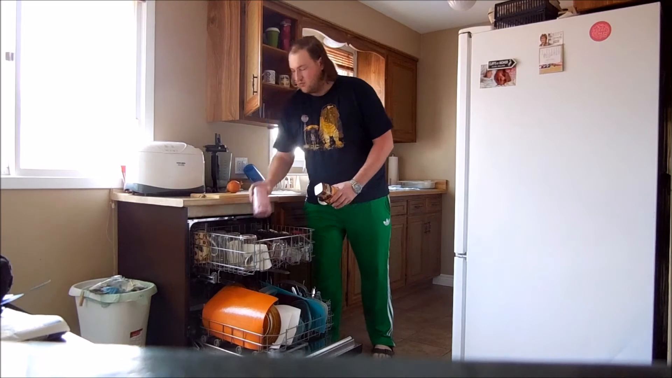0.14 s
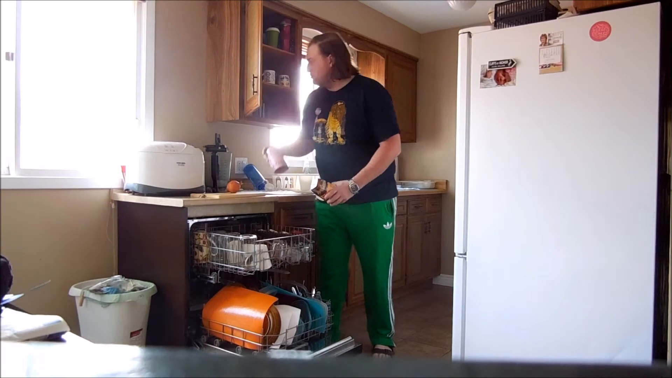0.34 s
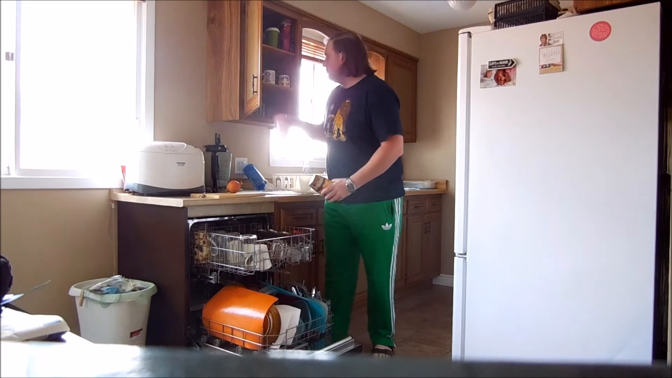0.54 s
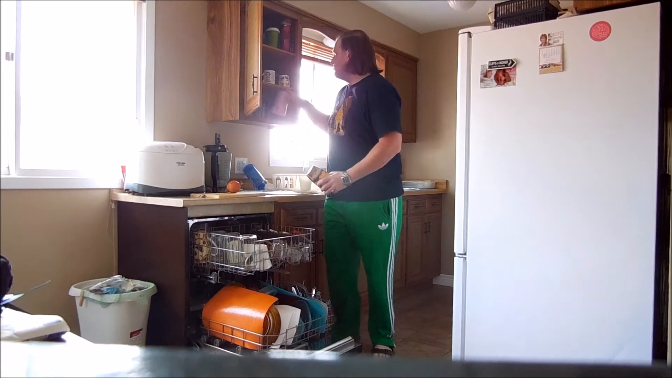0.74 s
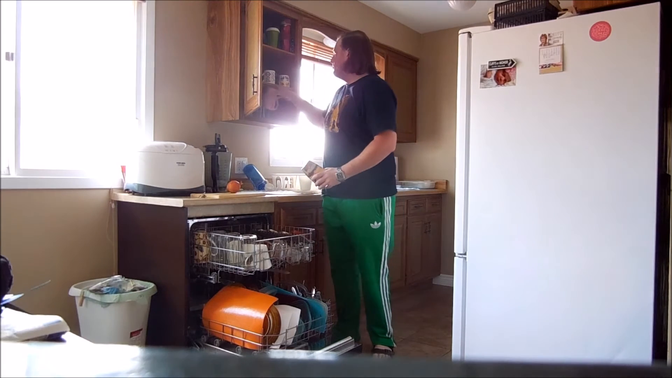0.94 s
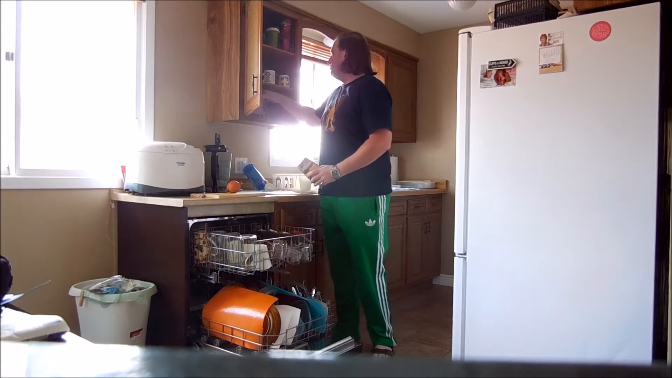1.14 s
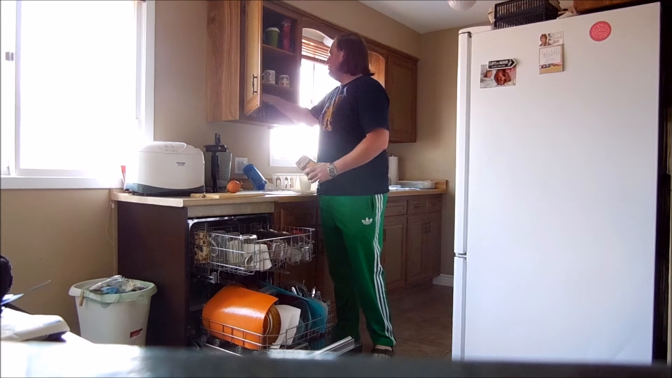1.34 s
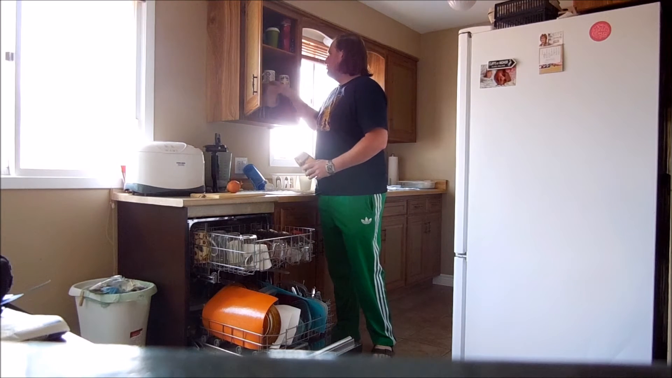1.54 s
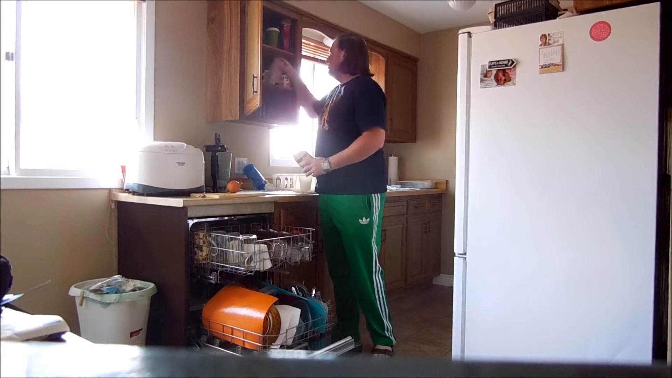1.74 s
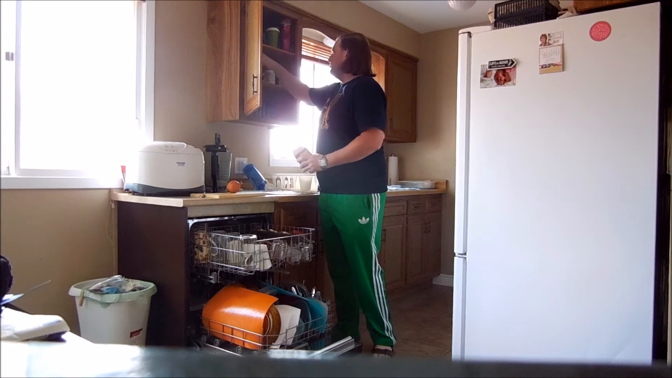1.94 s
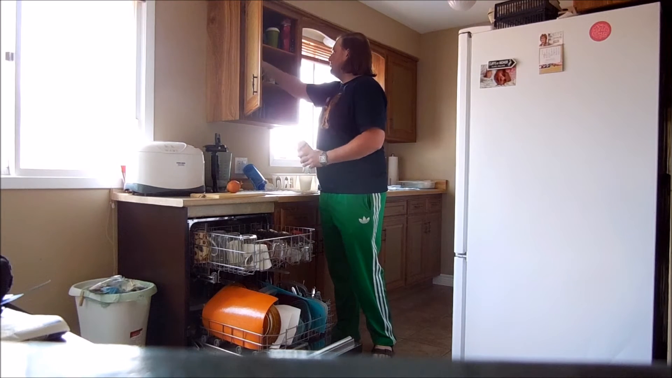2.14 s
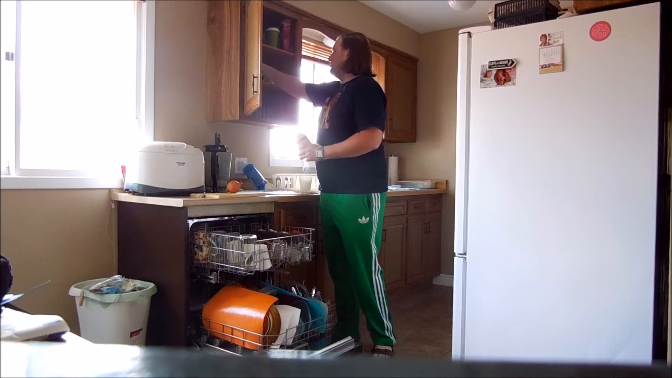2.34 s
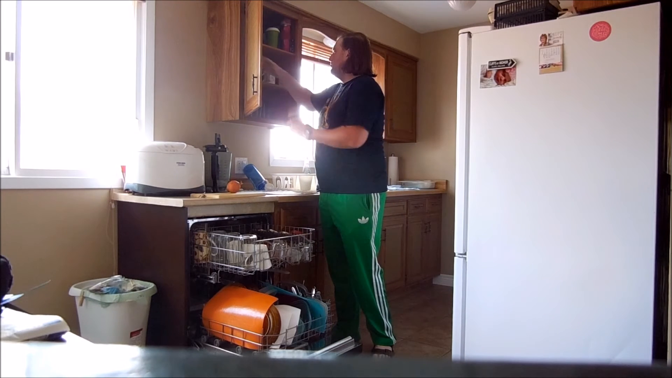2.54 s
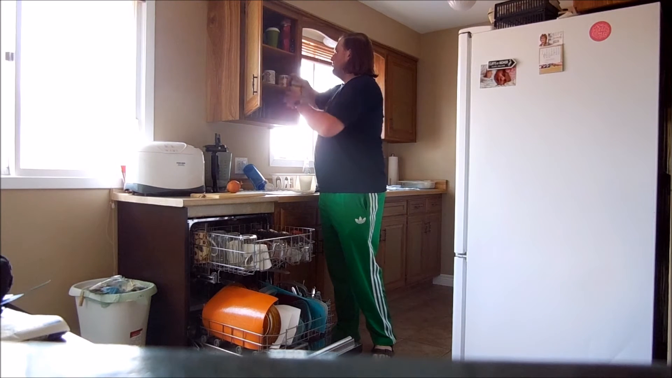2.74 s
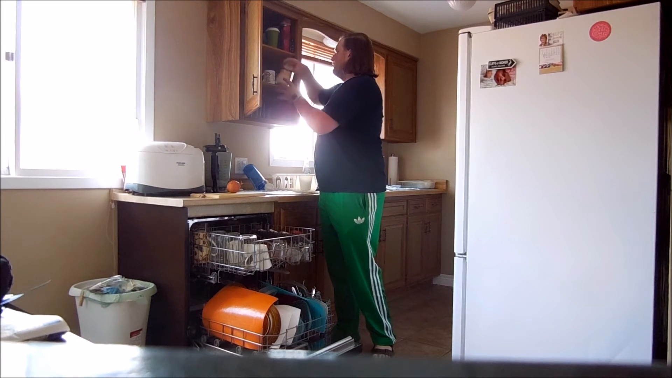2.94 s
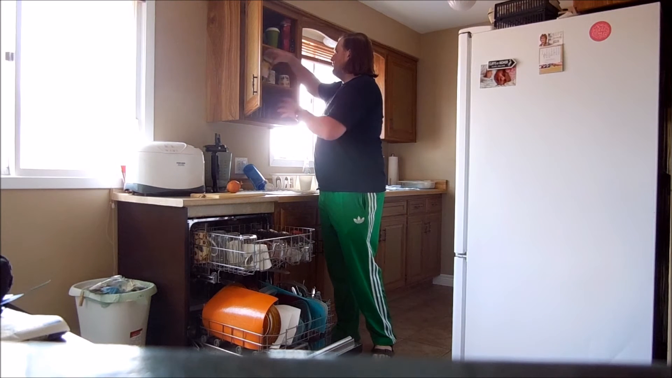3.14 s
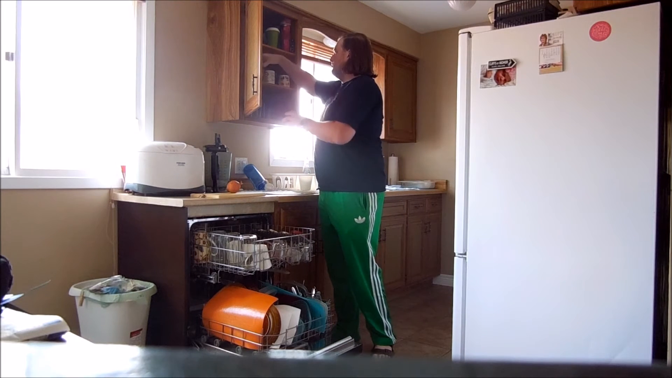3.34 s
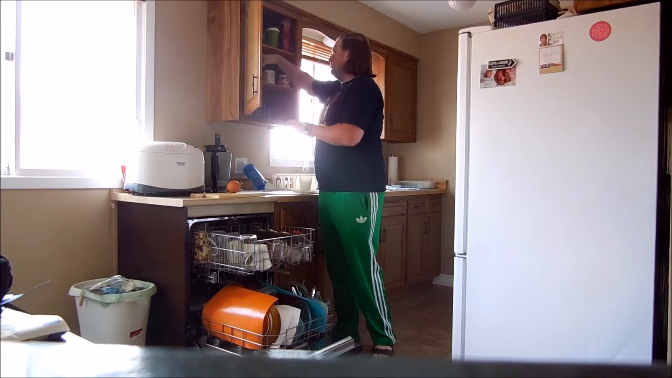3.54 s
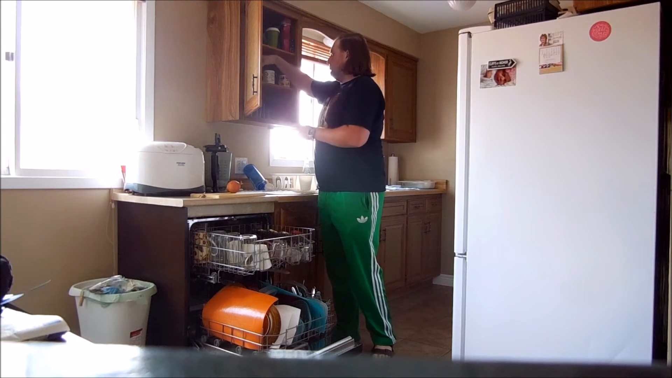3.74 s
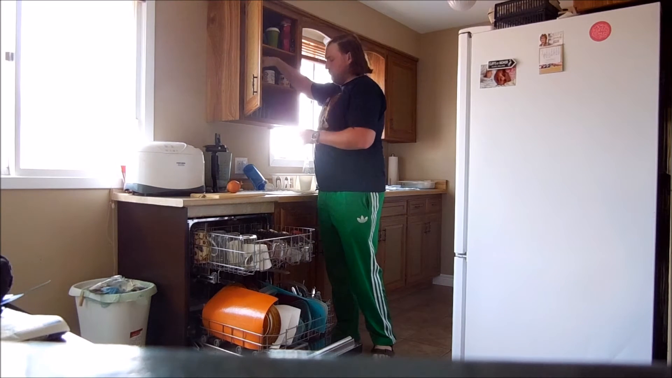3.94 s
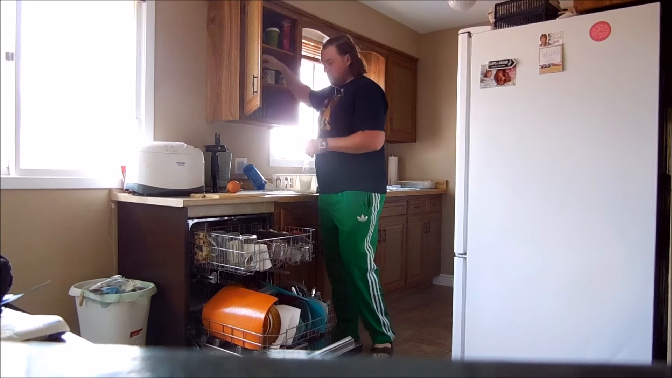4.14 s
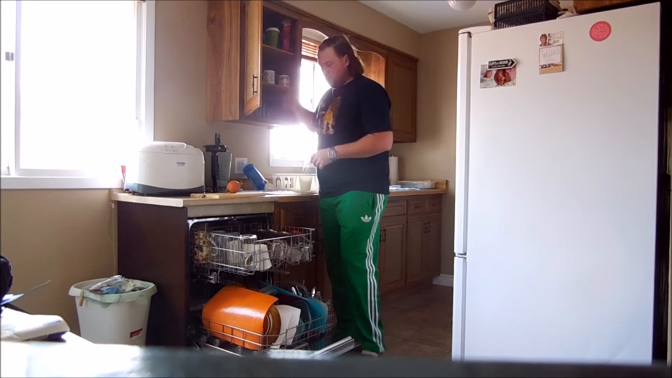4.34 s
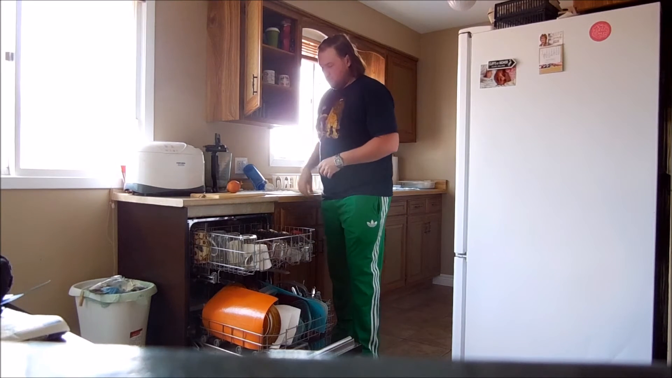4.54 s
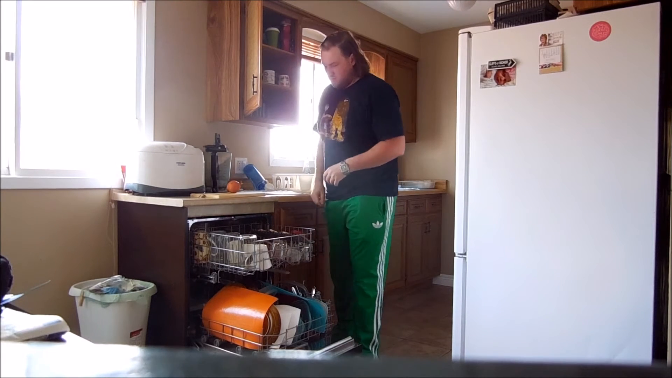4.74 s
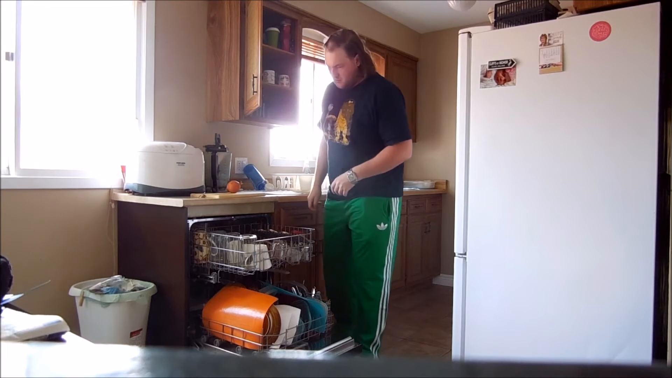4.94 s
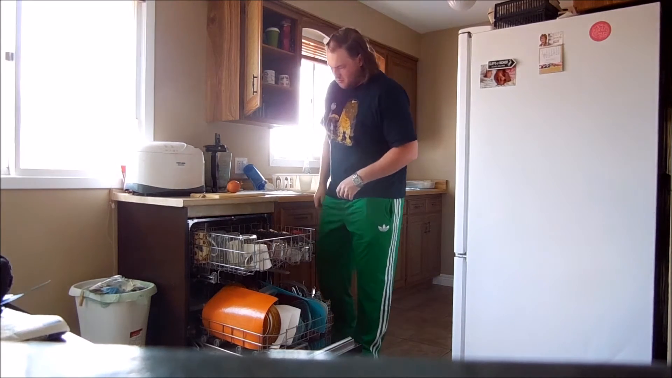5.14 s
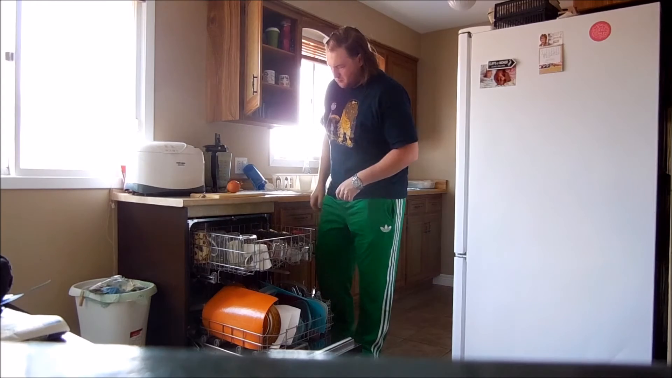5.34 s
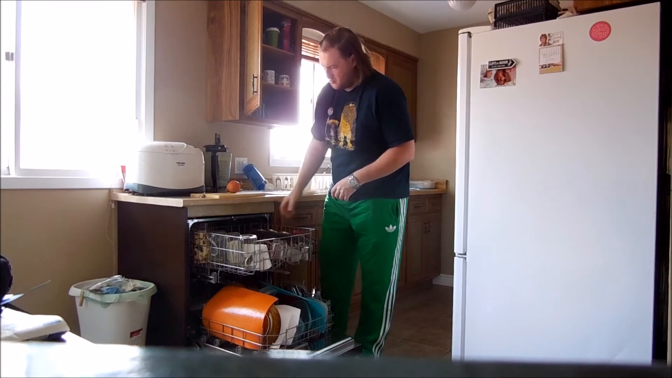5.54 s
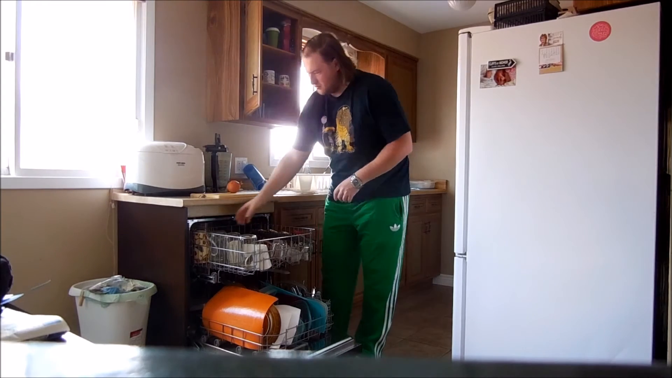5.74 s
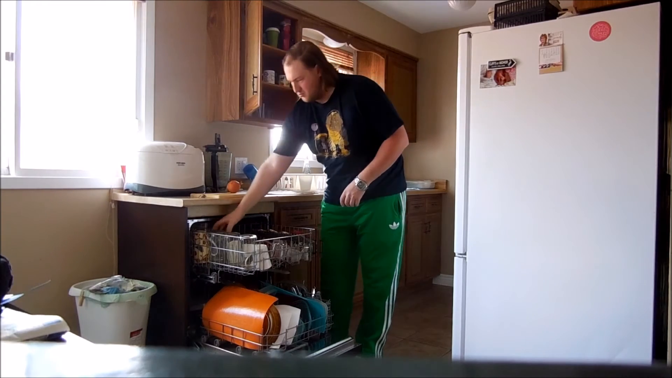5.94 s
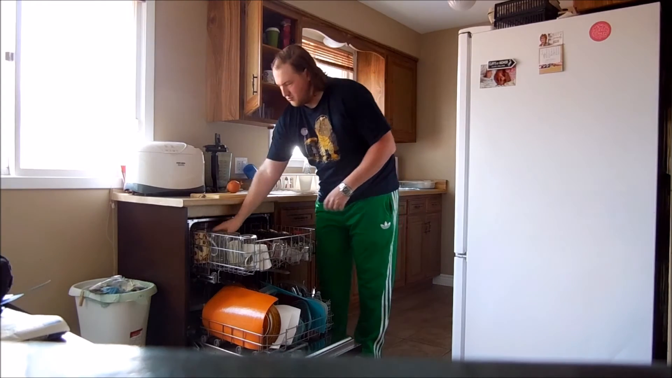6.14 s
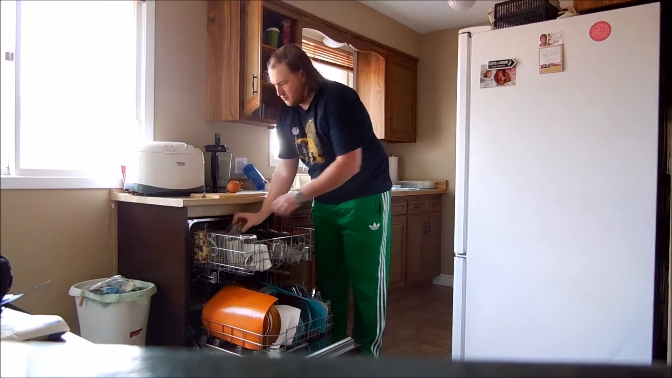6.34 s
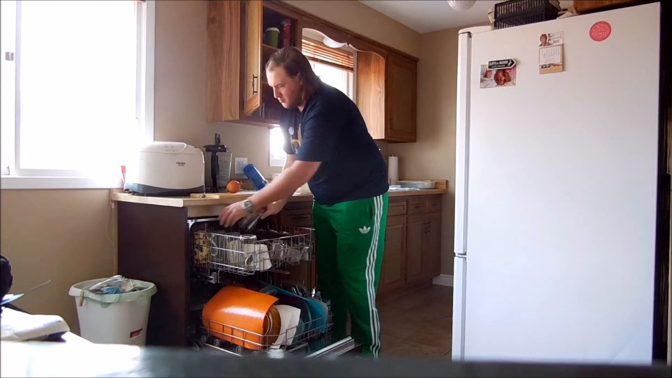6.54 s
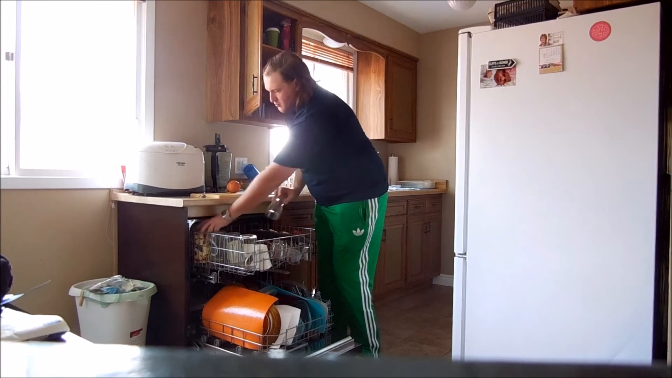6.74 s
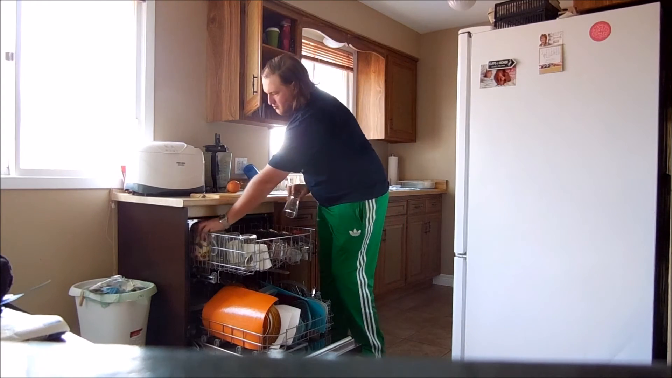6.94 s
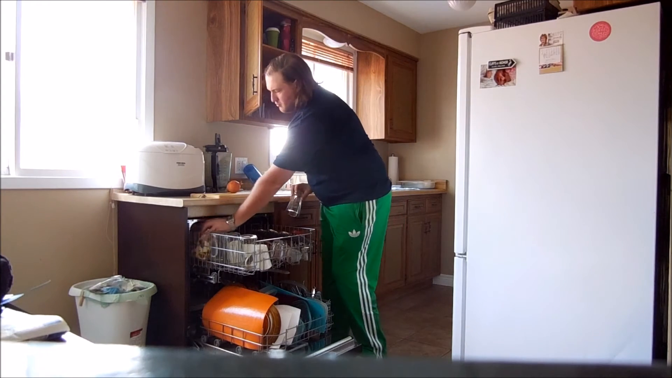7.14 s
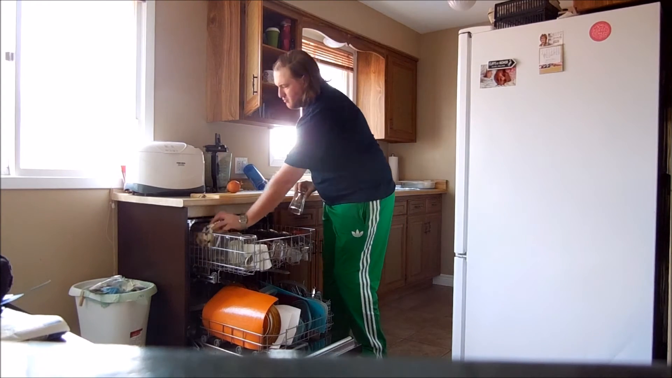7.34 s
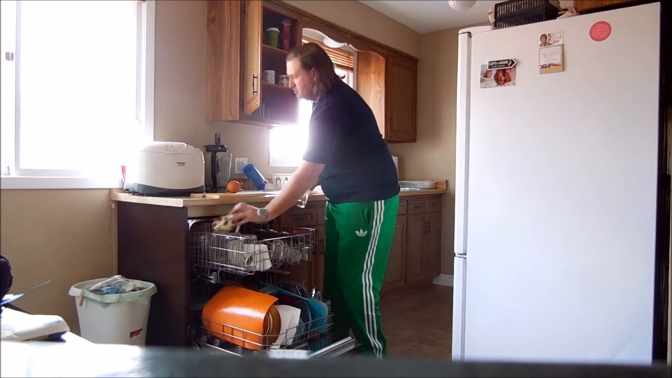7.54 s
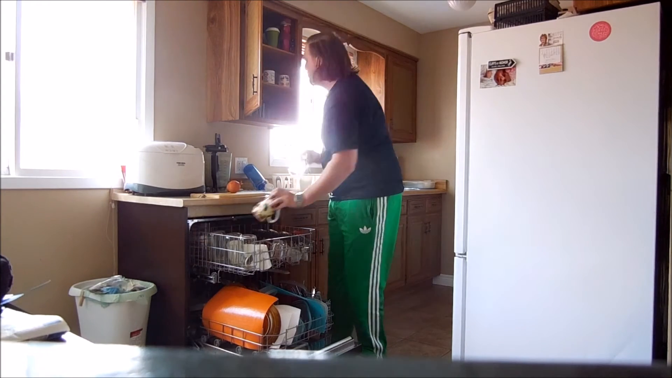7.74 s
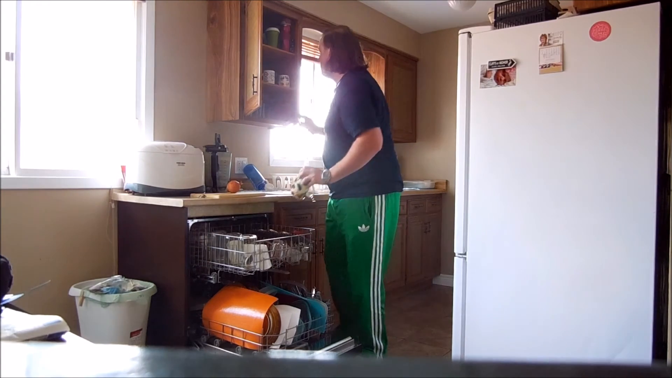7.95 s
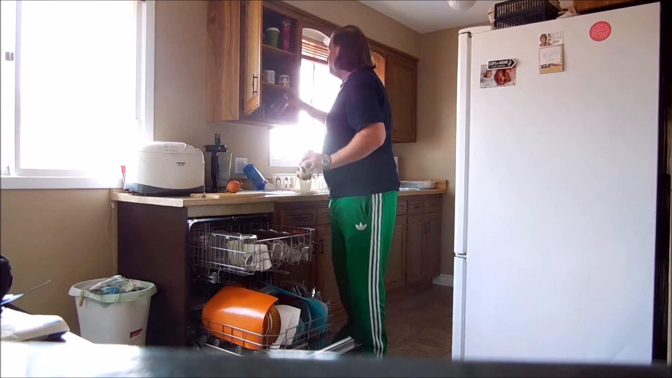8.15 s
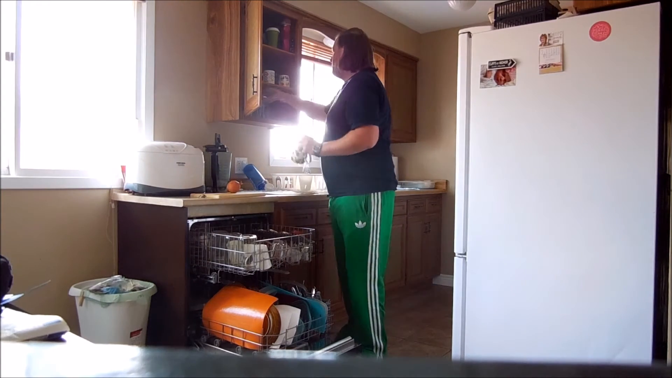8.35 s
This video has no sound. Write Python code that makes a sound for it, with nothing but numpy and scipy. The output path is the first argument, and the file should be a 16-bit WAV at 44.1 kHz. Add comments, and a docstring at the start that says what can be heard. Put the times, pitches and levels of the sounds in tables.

```python
"""A dishwasher is unloaded in a hard-walled kitchen, heard from across the room over a low hum and hiss.
First a tumbler clinks as the wire rack is jolted, then clothes swish and a base knocks on a wooden shelf.
Fingers tap a glass and a hand bumps the cupboard; then glasses and mugs clink and knock there.
Later more glasses clink, the rack is jolted and its wires rattle, and clothes swish again.
Glasses and mugs ring as sums of fading modes; knocks, cloth and room are shaped by coloured spectra."""
import sys
import numpy as np
from scipy import signal
from scipy.fft import rfft, irfft, next_fast_len
from scipy.io import wavfile
from scipy.ndimage import uniform_filter1d

SR = 44100
rng = np.random.default_rng(int(sys.argv[2]) if len(sys.argv) > 2 else 0)


def transcribe(u):
    """Save the signal u as a 16-bit wav file named by the first command-line argument.

    u: samples, shape (n,) or (channels, n), limited to [-1, 1]; the rate is SR.
    q: integer samples, one column per channel.
    """
    v = np.clip(np.atleast_2d(u).T, -1, 1)
    q = np.round(v * 32767).astype(np.int16)
    wavfile.write(sys.argv[1], SR, q)


N = 370881
HZ = np.maximum(np.fft.rfftfreq(SR, 1 / SR), 1)   # each blow is computed as one second of sound
AGE = np.arange(SR) / SR   # seconds since the blow
ONE_SAMPLE = np.exp(-2j * np.pi * HZ / SR)   # spectrum of a one-sample delay


def from_db(db):
    """Turn decibels into a gain."""
    return 10 ** (np.asarray(db) / 20)


def at_hz(points, hz):
    """Read a table between its points, on a log-frequency axis."""
    knots, values = np.transpose(points)
    return np.interp(np.log(hz), np.log(knots), values)


# How much the two channels differ: they sit a hand's width apart and hear the bass alike.
# Each row: frequency in Hz, side-to-mid level in dB.
SIDE_DB = [(40, -11), (85, -10), (180, -15), (350, -13.5), (750, -11.5), (1400, -5.5), (2800, -1),
           (5600, 0), (10000, -1.5), (14000, -.5)]


def diffuse(hz):
    """Spectrum of noise arriving from all sides at two close listening points."""
    apart = from_db(at_hz(SIDE_DB, hz))
    mid, side = rng.standard_normal((2, len(hz))) + 1j * rng.standard_normal((2, len(hz)))
    return np.array([mid + apart * side, mid - apart * side]) / np.sqrt(1 + apart ** 2)


# The quiet of the room, a low hum and hiss.
# Each row: frequency in Hz, relative level in dB per Hz.
HUSH_COLOUR = [(12, -33.5), (20, -5.5), (60, -2), (81, -14.5), (104, -12.5), (193, -17), (248, -14),
               (310, -18), (558, -21.5), (678, -22.5), (849, -23), (949, -23.5), (2750, -23),
               (14700, -23.5), (16000, -26)]


def room_noise(colour):
    """Noise from all sides with a given colour, scaled to an rms of 1."""
    size = next_fast_len(N, real=True)
    hz = np.maximum(np.fft.rfftfreq(size, 1 / SR), 1)
    noise = irfft(diffuse(hz) * from_db(at_hz(colour, hz)), size)[:, :N]
    return noise / noise.std()


def hush(level_db=-53):
    """Steady coloured noise gives the hum and hiss under everything."""
    return from_db(level_db) * room_noise(HUSH_COLOUR)


def causal(db):
    """The minimum-phase response with these levels: nothing sounds before the blow."""
    cepstrum = irfft(np.log(from_db(db)), SR)
    cepstrum[1:SR // 2] *= 2
    cepstrum[SR // 2 + 1:] = 0
    return np.exp(rfft(cepstrum))


# How long the kitchen echoes.
# Each row: frequency in Hz, time to fade by 60 dB in seconds.
KITCHEN = [(150, 0.68), (900, 0.65), (4000, 0.66), (13000, 0.38)]


def kitchen(direct_db=-16.0, early_db=2.5, early_s=0.086, build_s=0.00056):
    """Response from one spot: a weak direct path, reflections that build up, a tail that dies by band."""
    field, knots = diffuse(HZ), np.log([hz for hz, t60 in KITCHEN])
    echoes = 0
    for share, (hz, t60) in zip(np.eye(len(knots)), KITCHEN):
        band = field * np.interp(np.log(HZ), knots, share)
        echoes = echoes + irfft(band, SR) * from_db(-60 * AGE / t60)
    early_lift = from_db(early_db / (1 + (AGE / early_s) ** 4))
    echoes = echoes * early_lift * (1 - np.exp(-AGE / build_s))
    echoes /= np.sqrt(np.sum(echoes ** 2) / 2)
    echoes[:, 0] += from_db(direct_db)
    return rfft(echoes)


def at_level(response, db):
    """Scale a blow to the energy of 50 ms of sound at this level."""
    energy = np.vdot(response, response).real / SR
    return response * (from_db(db) * np.sqrt(SR / 20 / energy))


def add(out, s, response):
    """Mix one blow in at its moment."""
    start = round(s * SR)
    out[:, start:start + SR] += irfft(response, SR)[:, :N - start]


BOUNCE_GAP_RATIO = 0.72   # the second gap between touches is this share of the first
SETTLE_DB = 10.5   # lost on the last touch, as the object comes to rest


def touches(s, gap_s, rebound_db):
    """An object lands, rebounds and touches once more, sooner: (s, dB against the first touch)."""
    last_s = s + gap_s * (1 + BOUNCE_GAP_RATIO)
    return [(s, 0), (s + gap_s, rebound_db), (last_s, rebound_db - SETTLE_DB)]


def resonance(hz, t60):
    """Spectrum of one mode: a pitch that fades by 60 dB in t60 seconds."""
    r = from_db(-60 / (t60 * SR))
    feedback = r * r * ONE_SAMPLE - 2 * r * np.cos(2 * np.pi * hz / SR)
    return (1 - ONE_SAMPLE * ONE_SAMPLE) / (1 + ONE_SAMPLE * feedback)


REFERENCE_HZ = 3000   # ring times and brightness are given around this pitch
# The bare crack of a hard contact, also used for finger taps.
# Each row: frequency in Hz, relative level in dB per Hz.
CRACK = [(100, -32.5), (500, -2), (1500, -8.5), (3000, 0.5), (5000, -1), (8500, 3), (13000, 2.5),
         (14500, -33), (16000, -20)]
# The pitches each vessel rings with; the air in the gripped glass hoots near 450 Hz.
# Each row under a vessel's name: frequency in Hz, relative level in dB.
MODES_OF = { "tumbler": [(2110, 2), (2175, -3), (2686, 2.5), (2998, -6.5), (3198, -9), (3386, -8),
            (4156, -13), (5399, -8.5), (5674, -14), (5782, -6), (6180, -25), (6406, -20), (6648, -3.5),
            (7117, -2.5), (7510, -30), (8150, -18), (8640, -11), (9039, -12), (9706, -29), (10078, -24),
            (11030, -7), (11165, -3), (12462, -24), (12925, -9), (13168, -21), (13442, -13)],
            "shelf glass": [(2105, -11.5), (2191, -11), (2756, -17.5), (2902, -12), (3052, -15),
            (3402, -14), (3569, -3), (4156, -7), (4980, -11), (5416, -6), (5690, -3), (6218, -20),
            (6347, -9), (7499, 1.5), (7634, -13), (8985, 0), (9103, -18.5), (9512, -0.5), (9889, -27),
            (10697, -21), (11047, -39), (11160, -23), (12328, -11), (12737, -19), (13205, -5),
            (13426, -26)], "mug": [(1141, 0.5), (1583, -18), (2191, -23), (2509, -6.5), (2692, 2.5),
            (3203, -10.5), (3440, -19), (3709, -10.5), (4840, -12), (5922, -11.5), (6298, -18.5),
            (6713, -16.5), (7440, -10), (7919, -17), (8080, -15), (8522, -10.5), (8995, -12.5), (9437, -12),
            (10438, -15), (11429, -14.5), (11924, -32), (12145, -34), (12478, -27), (12979, -10.5),
            (13641, -14), (14120, -26)], "neighbour": [(2202, 5.5), (3219, 2.5), (3402, -14), (3510, -5),
            (3714, -5.5), (4371, -8), (4845, -8), (6519, -5), (7418, -3), (8129, -2), (8425, -5),
            (9071, -9), (9367, -15), (9528, -3), (10239, -11), (10460, -10), (11170, -24), (11757, -23),
            (12107, -24), (12182, -15), (12328, -18), (12462, -19), (12758, -25), (12861, -15),
            (13641, -31), (14357, -32)], "heavy glass": [(2196, 3), (2923, -21), (3408, 4.5), (3709, -0.5),
            (3957, -14), (4161, -7), (4657, -15), (4872, 4.5), (5798, 0.5), (6487, -16), (6589, -8),
            (7127, -10), (7397, 0), (9017, -8), (9189, -5), (9480, 0.5), (9593, -8), (10293, -1),
            (10654, -2), (11186, 1.5), (11967, -6), (12102, -16), (12796, -11), (13173, 3), (13507, -19),
            (13663, -13)], "shelf mug": [(851, -11.5), (1314, -12), (2536, -12), (2702, -10.5),
            (3208, -5.5), (3408, -10), (3731, -5.5), (4064, -10), (4387, -4.5), (4823, -0.5), (5437, -9),
            (5959, -6), (6508, -6.5), (7068, -5), (7946, -9), (9022, -1), (9205, -8), (9469, -5.5),
            (10610, -8), (11165, -8), (11445, -8), (11967, -7), (12495, -9), (13604, -20), (13679, -21),
            (14174, -8)], "rack glass": [(2250, 1.5), (2853, -14.5), (3391, -24), (3682, -18), (4667, -2),
            (5195, -14), (5636, -21), (5986, -14), (6476, -7.5), (7779, 1), (7854, -6), (8048, -4.5),
            (8366, -11), (9205, -5), (10250, -18), (10799, -27), (11610, -26), (11779, 1), (12204, -14),
            (12925, -32), (13415, -17), (14734, -32)], "rim": [(1890, -48), (2492, -12), (2568, -29),
            (3994, -11), (6250, -19), (6804, -13.5), (8597, -5.5), (9178, 0.5), (9232, 4.5), (9399, -16),
            (12155, -13), (12328, -10), (13259, -24), (14018, -16)], "thin glass": [(1410, -18.5),
            (1690, -15), (1809, -24), (1911, -3), (2256, -25), (2476, -10.5), (3391, -1.5), (4350, -22),
            (5200, -18), (5362, -5), (5981, -23), (6148, -19), (6255, -51), (7440, -23), (7628, -22),
            (7908, -20), (8032, -24), (8193, -21), (9561, -31), (9738, -30), (10713, -14), (11413, -15),
            (11639, -13), (13049, -19), (13555, -18), (13867, -21)], "gripped glass": [(269, -6.5),
            (425, 4), (452, 5), (770, -12), (894, -19), (1050, -23), (1281, -34), (1830, -15), (1895, -13),
            (2480, -22), (3480, -13), (4258, -12.5)], }
# How each vessel rings, damped by hand or shelf, and where it is.
# Each row, by vessel name: time to fade by 60 dB at 3 kHz in seconds, left-over-right level in dB.
RING = {"tumbler": (0.18, -0.81), "shelf glass": (0.16, 0), "mug": (0.3, -.4), "neighbour": (0.2, -0.33),
        "heavy glass": (0.11, -0.61), "shelf mug": (0.07, -.3), "rack glass": (0.2, -0.34),
        "rim": (0.059, 0.49), "thin glass": (0.15, 0.23), "gripped glass": (0.068, .2)}
# Vessel against vessel.
# Each row: start in seconds, vessel, ring level in dB, brightness in dB per octave,
# contact clack level in dB, rebound delay in seconds, rebound level in dB against the first touch.
CLINKS = [ (0.091, "tumbler", -26.5, 0.2, -38, 0.065, -2.5),
          (2.552, "shelf glass", -25, -5, -34, 0.021, -2.5), (3.463, "mug", -11.5, 1, -20, 0.029, -5.5),
          (3.562, "mug", -13.5, 4.5, -22, 0.03, -25), (3.709, "neighbour", -25, 2, -33, 0.053, -2.5),
          (3.876, "heavy glass", -24, 0.1, -30, 0.022, 4),
          (4.105, "shelf mug", -22, -2.5, -37, 0.026, -12.5),
          (6.492, "rack glass", -26, 11, -30, 0.013, -2),
          (6.544, "rack glass", -11, -1.1, -21.5, 0.026, -21),
          (6.596, "rack glass", -16.5, 2, -35, 0.030, -3.5),
          (6.782, "rack glass", -40.5, -19, -73, 0.135, -20.5),
          (7.147, "rim", -17.5, 1.5, -33, 0.016, -2.5), (7.199, "rim", -39, -1, -42, 0.012, -13),
          (7.174, "thin glass", -37, 5, -41, 0.093, -4), (7.385, "thin glass", -18.5, 0.8, -29, 0.022, -7),
          (7.660, "thin glass", -42, -7, -53, 0.03, -16),
          (7.770, "thin glass", -37.5, -2, -41.5, 0.036, -10.5),
          (7.152, "gripped glass", -32, 3, -51, 0.124, -4),
          (8.178, "gripped glass", -38.5, 0.5, -55, 0.082, -14), ]


def clinks(damping_slope=0.91, choked_t60_s=0.0084, choked_contrast=0.091, bare_crack_db=-2.0):
    """While two walls touch, their modes choke into a clack; then they ring free, high modes dying sooner."""
    out, crack = np.zeros((2, N)), causal(at_hz(CRACK, HZ))
    for vessel, (ring_s, pan_db) in RING.items():
        pitches, mode_db = np.transpose(MODES_OF[vessel])
        # the support keeps low modes from ringing longer
        t60s = ring_s * np.minimum(REFERENCE_HZ / pitches, 1) ** damping_slope
        free = np.array([resonance(hz, t60) for hz, t60 in zip(pitches, t60s)])
        choked = np.array([resonance(hz, choked_t60_s) for hz in pitches])
        power, signs = np.abs(free) ** 2, (-1) ** np.arange(len(pitches))
        pan = np.array([[pan_db / 2], [-pan_db / 2]])
        for s, struck_vessel, ring_db, bright_db, clack_db, gap_s, rebound_db in CLINKS:
            if struck_vessel != vessel:
                continue
            # a harder contact favours high modes
            struck_db = mode_db + bright_db * np.log2(pitches / REFERENCE_HZ)
            clack = from_db(choked_contrast * struck_db) @ choked
            for moment, touch_db in touches(s, gap_s, rebound_db):
                room = kitchen()
                # even out what each mode gains from its ring time and the room
                mode_size = np.sqrt(power @ np.sum(np.abs(room) ** 2, axis=0))
                ringing = (signs * from_db(struck_db) / mode_size) @ free
                blow = at_level(ringing * room, ring_db)
                blow = blow + at_level(clack * room, clack_db)
                blow = blow + at_level(crack * kitchen(), clack_db + bare_crack_db)
                add(out, moment, blow * from_db(touch_db + pan))
    return out


def struck(body, contact_hz, softness):
    """Response of a well-damped body; a soft contact leaves out its treble."""
    return causal(at_hz(body, HZ) - softness * 10 * np.log10(1 + (HZ / contact_hz) ** 2))


def thuds(blows, body, softness):
    """Blows on a well-damped body, each with its rebounds."""
    out = np.zeros((2, N))
    for s, level_db, contact_hz, gap_s, rebound_db in blows:
        thud = struck(body, contact_hz, softness)
        for moment, touch_db in touches(s, gap_s, rebound_db):
            room = kitchen(direct_db=-19.0, early_db=3.5, build_s=0.0011)
            add(out, moment, at_level(thud * room, level_db + touch_db))
    return out


# The sound of the wire rack, also used for its rattle.
# Each row: frequency in Hz, relative level in dB per Hz.
RACK = [(50, -13), (140, 2.5), (260, -11), (370, -5.5), (435, 5.5), (510, -6.5), (900, -1.5), (1300, -6.5),
        (2500, -5.5), (5000, -7), (12000, -5), (15000, -17)]
# The wire rack is jolted.
# Each row: start in seconds, level in dB, contact bandwidth in Hz,
# rebound delay in seconds, rebound level in dB against the first touch.
JOLTS = [ (0.092, -38.5, 3500, 0.083, -4), (5.930, -56, 1200, 0.03, -12), (6.497, -47.5, 7500, 0.06, 10),
         (6.632, -42, 6000, 0.042, -16), (7.152, -36, 4000, 0.012, -9), (7.275, -32.5, 3000, 0.022, -1),
         (7.775, -42, 900, 0.02, -7), (8.195, -43.5, 685, 0.049, -8), ]


def jolts():
    """Short blows set off the well-damped wires of the rack."""
    return thuds(JOLTS, RACK, softness=0.91)


# The sound of rubbing cloth.
# Each row: frequency in Hz, relative level in dB per Hz.
CLOTH = [(200, -5), (1000, -9.5), (2500, -6), (6000, -6), (11000, -4), (15500, -13)]
# Clothes swish as the body turns.
# Each row: start in seconds, length before the fade in seconds, level in dB.
SWISHES = [(0.581, 0.15, -48), (7.873, 0.11, -46), (8.227, 0.072, -51.5)]


def swishes(attack_s=0.034, release_s=0.05):
    """Cloth rubs for as long as the turn lasts: its noise swells, holds and fades."""
    t, rubbing = np.arange(N) / SR, 0
    for s, length_s, level_db in SWISHES:
        swell = np.clip((t - s) / attack_s, 0, 1)
        fade = np.exp(-np.maximum(t - s - length_s, 0) / release_s)
        rubbing = rubbing + from_db(level_db) * swell * fade
    return rubbing * room_noise(CLOTH)


# The sound of the wooden shelf.
# Each row: frequency in Hz, relative level in dB per Hz.
SHELF = [(40, -46), (90, -25.5), (135, -6), (185, -8.5), (240, -5), (330, -6), (430, -6), (600, 2),
         (950, -0.5), (1600, 0), (3000, -5.5), (6000, -10.5), (12000, -6), (15000, -27)]
# Bases are set down or nudged on the shelf.
# Each row: start in seconds, level in dB, contact bandwidth in Hz,
# rebound delay in seconds, rebound level in dB against the first touch.
KNOCKS = [ (0.926, -50, 1200, 0.02, -3.5), (1.175, -58, 2000, 0.037, -22),
          (2.401, -19.5, 1990, 0.012, -5.5), (2.500, -25.5, 1300, 0.051, -5),
          (3.464, -27, 1700, 0.025, 9.5), (3.583, -21, 1400, 0.04, -18.5), (3.876, -23.5, 2000, 0.022, 2.5),
          (4.108, -34, 1167, 0.031, -4), ]


def knocks():
    """A base lands on wood, which gives a dull, quickly damped knock."""
    return thuds(KNOCKS, SHELF, softness=1.29)


# Fingers tap on a held glass.
# Each row: start in seconds, level in dB.
TAPS = [(0.933, -47.5), (3.322, -57), (4.637, -45), (5.055, -53.5)]


def taps():
    """A gripped glass gives only the crack of the contact."""
    out, crack = np.zeros((2, N)), causal(at_hz(CRACK, HZ))
    for s, level_db in TAPS:
        add(out, s, at_level(crack * kitchen(), level_db))
    return out


# The sound of the cupboard box.
# Each row: frequency in Hz, relative level in dB per Hz.
CUPBOARD = [(50, -19), (100, -20), (135, 0), (170, -6), (205, 4.5), (250, -10), (330, -3.5), (480, -13),
            (625, -4), (730, -10), (845, -10), (1250, -16.5), (2200, -27), (15000, -24)]
# A hand bumps the cupboard.
# Each row: start in seconds, level in dB, contact bandwidth in Hz,
# rebound delay in seconds, rebound level in dB against the first touch.
BUMPS = [(1.513, -43.5, 1200, 0.034, 5.5), (1.602, -46.5, 850, 0.048, -14)]


def bumps():
    """A soft hand sets off the low, damped resonances of the box."""
    return thuds(BUMPS, CUPBOARD, softness=0.42)


# The wires rattle while a glass is worked free of them.
# Each row: time in seconds, relative tick level in dB.
RATTLE = [(7.05, -52.5), (7.13, -43), (7.25, -51), (7.32, -35), (7.38, -45), (7.52, -38.5), (7.62, -47.5),
          (7.85, -51.5), (7.98, -48)]


def rattle(ticks_per_s=70, trim_db=-0.5, contact_hz=1700, softness=0.62, uneven_db=5.0, count=4):
    """Several wires of the rack tick at uneven moments as a glass slides between them."""
    knots, level_db = np.transpose(RATTLE)
    out, wire = np.zeros((2, N)), struck(RACK, contact_hz, softness)
    for _ in range(count):
        late, luck = rng.random((2, 100))
        # each wire ticks once, at a random moment, in each of its time slots
        moments = knots[0] + (np.arange(100) + late) * count / ticks_per_s
        sizes = from_db(np.interp(moments, knots, level_db) + uneven_db * (2 * luck - 1))
        ticks, sliding = np.zeros((1, N)), moments < knots[-1]
        ticks[0, (moments[sliding] * SR).astype(int)] = sizes[sliding]
        # more ticks per second means less energy in each
        response = irfft(at_level(wire * kitchen(), trim_db), SR) / np.sqrt(ticks_per_s / 20)
        out += signal.oaconvolve(ticks, response, axes=1)[:, :N]
    return out


def scene():
    """Glass, shelf, cupboard and rack over the swish of clothes and the quiet of the room."""
    return hush() + clinks() + jolts() + swishes() + knocks() + taps() + bumps() + rattle()


def limiter(x, ceiling_db=-12.5, release_db_per_s=129.0):
    """The gain ducks when the short-term level passes the ceiling, then recovers."""
    loudness = uniform_filter1d(np.mean(x ** 2, axis=0), size=220)   # over about 5 ms
    level_db = 10 * np.log10(np.abs(loudness) + 1e-12)
    ramp = release_db_per_s * np.arange(N) / SR
    # a running maximum on a rising ramp lets the ducking shrink at a steady rate
    duck_db = np.maximum.accumulate(np.maximum(level_db - ceiling_db, 0) + ramp) - ramp
    return x * from_db(-uniform_filter1d(duck_db, size=90))


def record(dry, cutoff_hz=15900):
    """The loudest moments are held down and the top is cut steeply."""
    lowpass = signal.ellip(12, .1, 90, cutoff_hz, fs=SR, output="sos")
    return signal.sosfilt(lowpass, limiter(dry))


dry = scene()
out = record(dry)
transcribe(out)
```